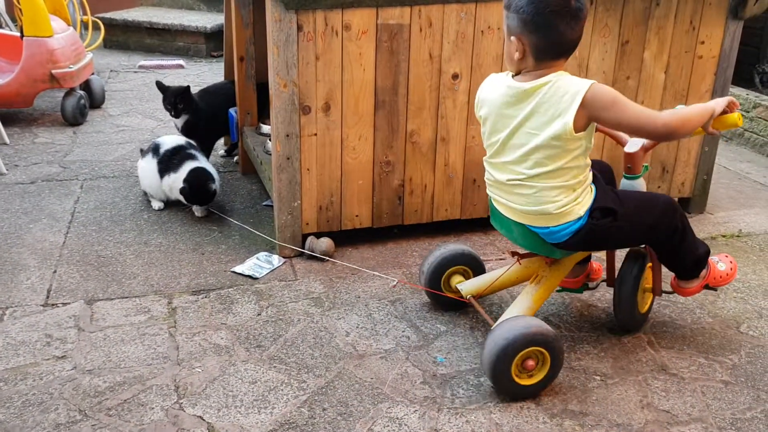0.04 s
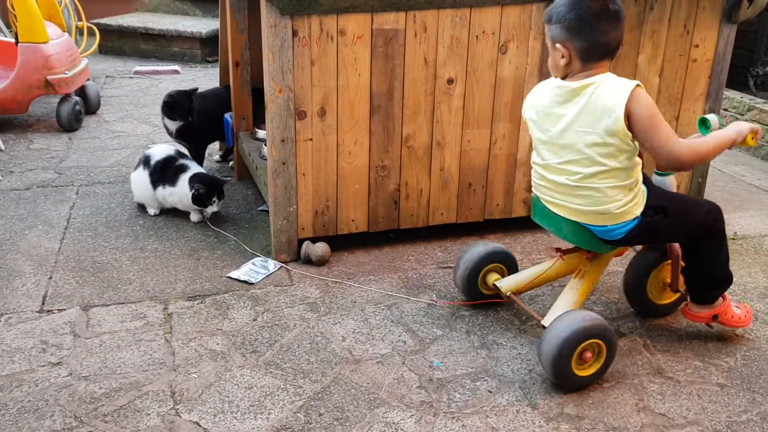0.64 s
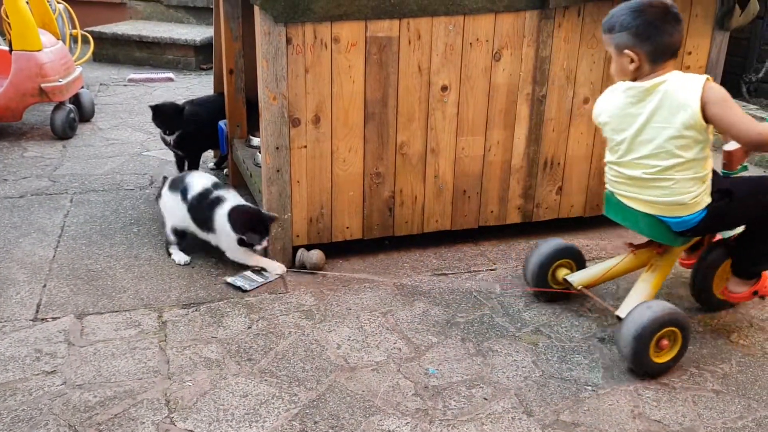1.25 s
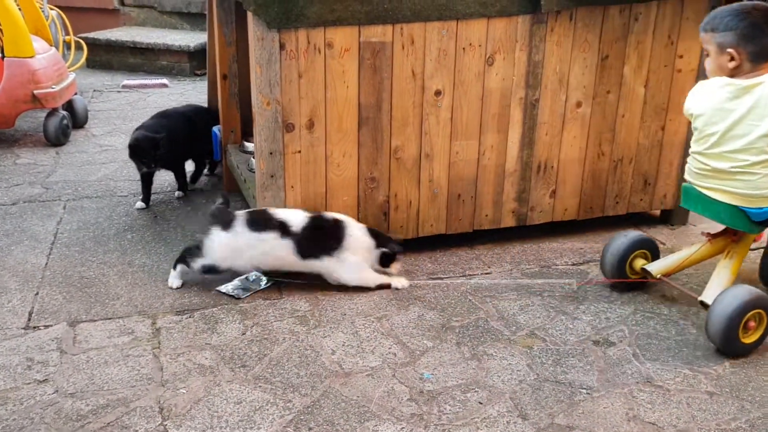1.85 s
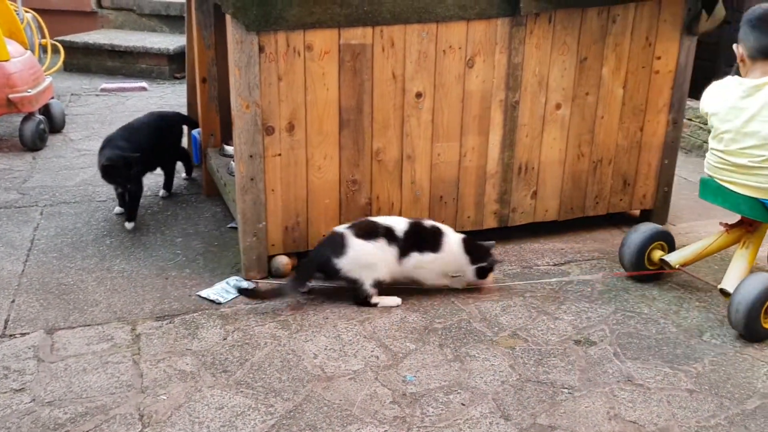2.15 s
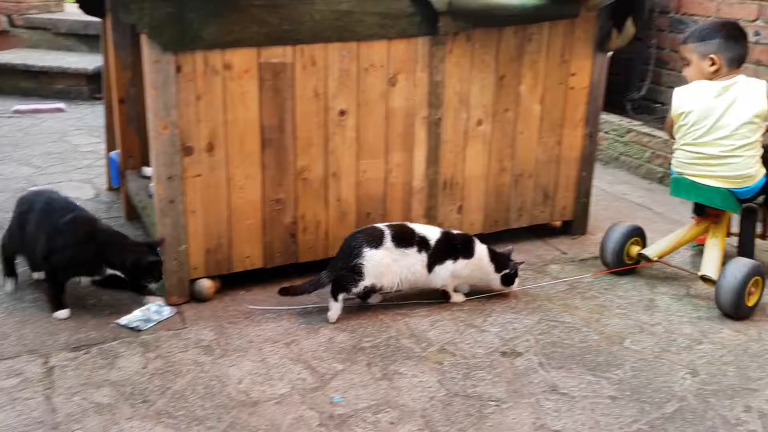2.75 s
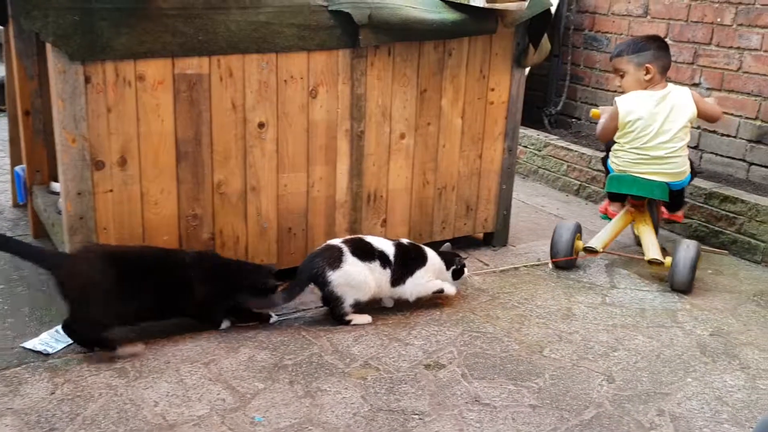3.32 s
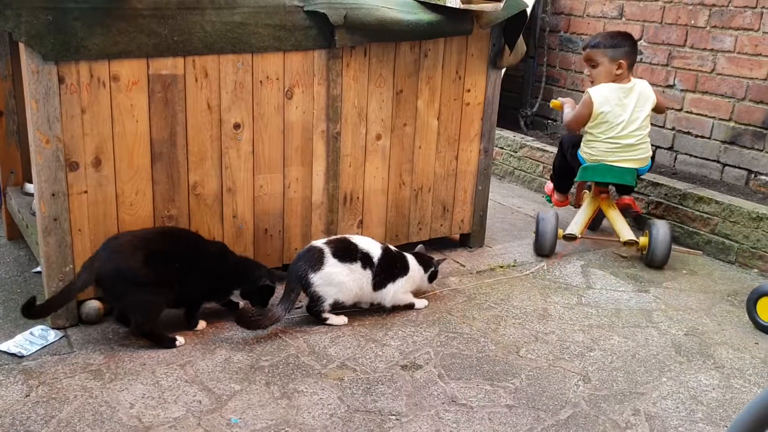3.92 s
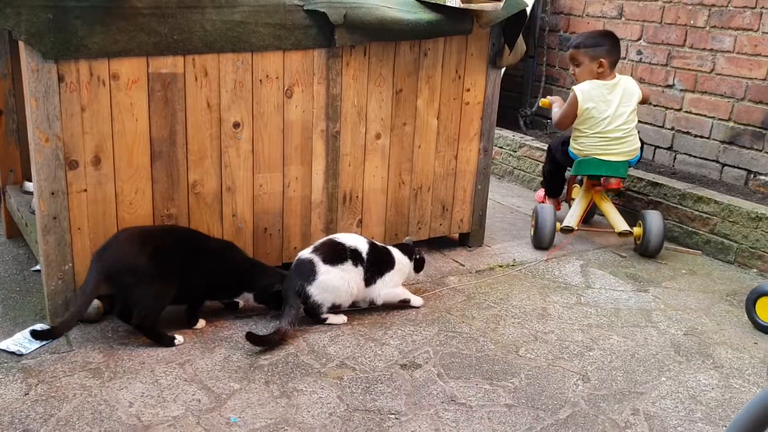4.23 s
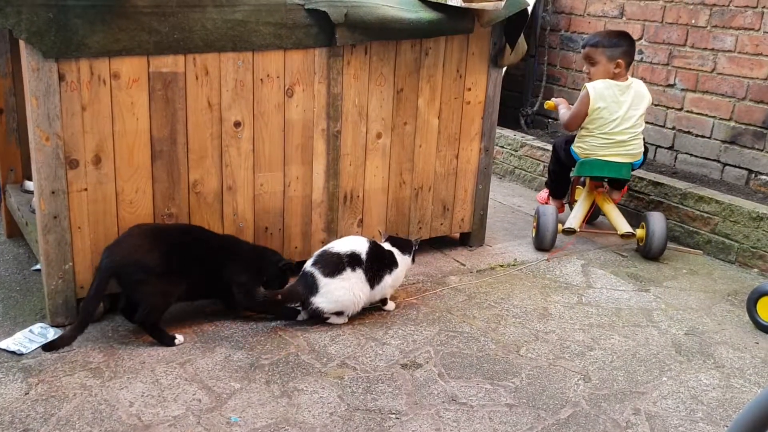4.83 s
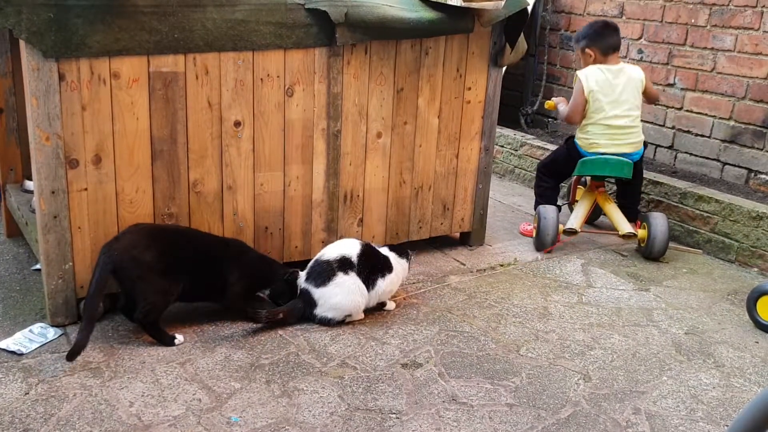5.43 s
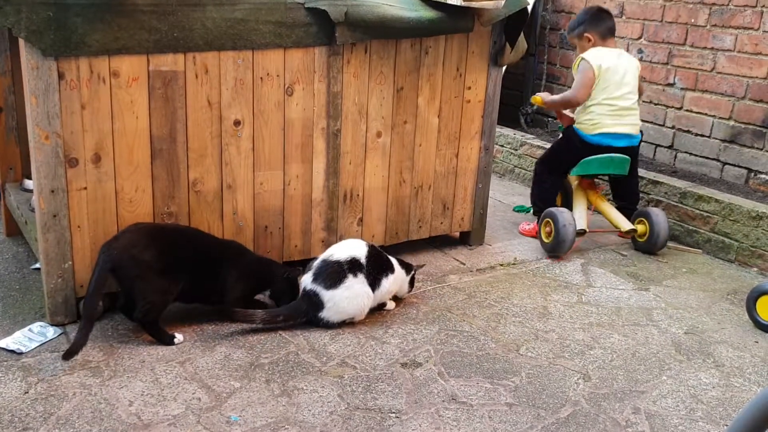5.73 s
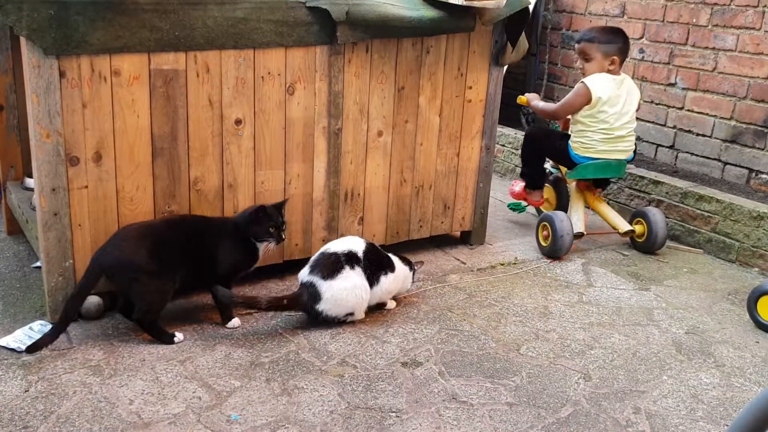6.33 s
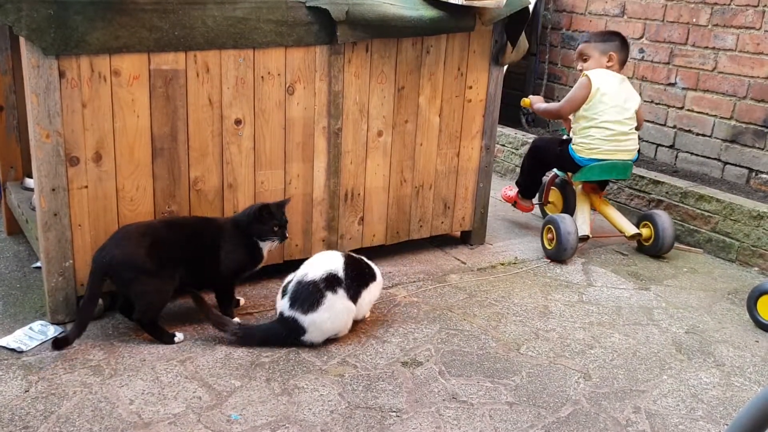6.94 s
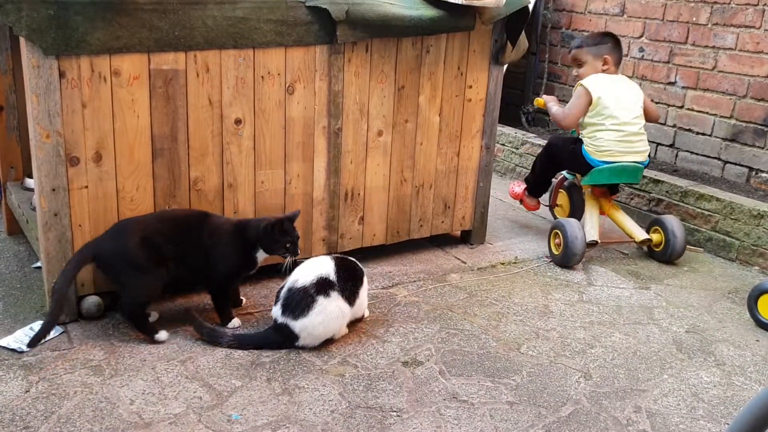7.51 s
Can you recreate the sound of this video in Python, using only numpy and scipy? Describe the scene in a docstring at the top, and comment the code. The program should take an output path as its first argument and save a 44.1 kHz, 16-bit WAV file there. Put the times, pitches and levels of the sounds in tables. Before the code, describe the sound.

In a small walled yard, hollow plastic tricycle wheels grind, rattle and clack across paving slabs nearby, stopping and starting. Grit crunches and snaps, and an axle groans briefly early on. The rolling thins into scuffs and scrapes, a distant bird whistles faintly, and the frame clatters in one rough jolt. A soft bump on the left and a sharp crack come at the end, over a quiet, steady town rumble.

```python
"""Hollow grinding, knocks and sharp cracks, stopping and starting: a plastic toy tricycle is pushed
over gritty paving in a walled yard. Its hollow wheels drum on the slabs, knock on their axles, groan
once and burst grains of grit. Shoes and tyres scuff, and once it is shoved round with a clatter.
Behind it are a low town rumble and a faint bird; a soft low bump comes near the end."""
import sys
import numpy as np
from scipy import signal
from scipy.fft import rfft, irfft, next_fast_len
from scipy.io import wavfile
from scipy.ndimage import map_coordinates

SR = 44100
rng = np.random.default_rng(int(sys.argv[2]) if len(sys.argv) > 2 else 0)


def unload_wav(signal):
    """Save mono or channel-first audio to the path in sys.argv[1] as 16-bit WAV at rate SR, clipped to [-1, 1]."""
    wavfile.write(
        sys.argv[1],
        SR,
        np.round(np.clip(np.atleast_2d(signal).T, -1, 1) * 32767).astype(np.int16),
    )


N = 338247

# The pitches a hollow wheel rings at. Each row: pitch in Hz, width in Hz, strength in dB.
WHEEL_RESONANCES = [(456, 59, 3.5), (910, 330, -4.5), (1817, 190, 3.5), (4210, 1300, -4)]
# Tone colours (how strong low and high sounds are). Each row: frequency in Hz, relative level in dB.
BOOM_COLOUR = [(120, -27.5), (250, -12.5), (340, -1.5), (500, -3), (700, -16.5), (1200, -16.5), (4000, -62)]  # a wheel's hollow inside
CLACK_COLOUR = [(300, -35.5), (650, 9.5), (1000, 14.5), (1700, 5.5), (2800, 6.5), (4200, 6.5),
                (15000, -80.5)]  # a wheel's hard shell
GRIT_COLOUR = [(500, 0.5), (2000, 5), (3800, 2), (7700, 2), (9000, -4.5), (12000, -3), (16000, -13.5)]  # a bursting grain
FRAME_COLOUR = [(250, 1.5), (800, 1), (1500, 1), (4200, -6.5), (8000, -10.5), (16000, -30)]  # the tricycle's frame


def amp(db):
    """Turns decibels into a number to multiply by."""
    return 10 ** (np.asarray(db) / 20)


def unit(x):
    """Scales a sound to an average (rms) level of 1."""
    return x / np.sqrt(np.mean(x ** 2) + 1e-20)


def along(points, hz):
    """Reads between (Hz, value) points, giving each octave about the same room."""
    frequencies, values = np.transpose(points)
    return np.interp(np.log(hz + 1), np.log(frequencies + 1), values)


def wobble(rate):
    """A smooth random curve through rate new values a second."""
    return map_coordinates(rng.standard_normal(int(N * rate / SR) + 4), [np.arange(N) * rate / SR])


def filtered(x, response):
    """Turns each frequency up or down by response(hz)."""
    n = x.shape[-1]
    padded = next_fast_len(n + SR // 20, True)
    return irfft(rfft(x, padded) * response(np.fft.rfftfreq(padded, 1 / SR)), padded)[..., :n]


def add(track, start_s, sound):
    """Mixes a sound into the track."""
    part = track[:, max(round(start_s * SR), 0):][:, :sound.shape[1]]
    part += sound[:, :part.shape[1]]


def centred(colour, centre_hz, fall_db):
    """Gives a tone colour a broad hump that falls by fall_db an octave on either side."""
    hz = np.geomspace(50, SR / 2, 60)
    return np.transpose([hz, along(colour, hz) - fall_db * np.abs(np.log2(hz / centre_hz))])


def detuned(resonances, spread):
    """Shifts each resonance's pitch a little, as when a wheel is hit at another spot."""
    return np.array(resonances) * np.exp(spread * rng.standard_normal((len(resonances), 1)) * [1, 0, 0])


def body(colour, resonances=(), ring_db=0, size=4096):
    """How an object answers one tap: a broad tone colour with ringing pitches standing out."""
    hz = np.fft.rfftfreq(size, 1 / SR)
    peaks = sum(amp(db + ring_db) * 1j * hz * width / (pitch * pitch - hz * hz + 1j * hz * width)
                for pitch, width, db in resonances)
    cepstrum = irfft(np.log(amp(along(colour, hz)) * np.abs(1 + peaks)))
    # Folding onto the first half makes the ringing follow the tap, never lead it.
    cepstrum[1:size // 2] *= 2
    cepstrum[size // 2 + 1:] = 0
    return irfft(np.exp(rfft(cepstrum)))[None]


def diffuse(n):
    """Stereo noise from all around: alike in the bass, unrelated in the treble."""
    # How alike the ears' sounds are. Each row: frequency in Hz, likeness (1 is the same, 0 unrelated).
    likeness = [(250, 0.89), (550, 0.55), (1000, -0.08)]
    angle = lambda hz: np.arccos(np.clip(along(likeness, hz), -1, 1)) / 2
    shares = lambda hz: np.array([np.cos(angle(hz)), np.sin(angle(hz))])
    mid, side = filtered(rng.standard_normal((2, n)), shares)
    return np.array([mid + side, mid - side])


def yard(direct_db=-15, near_fade_s=0.11, tail_db=-11, rise_s=0.0046):
    """One path to the listener: direct sound, quick echoes off slabs and fence, then the walls' echo."""
    # How long the walls echo. Each row: frequency in Hz, seconds to fade by 60 dB.
    fade_times = [(300, 0.29), (15000, 0.24)]
    n = SR // 4
    t = np.arange(n) / SR
    hz, times, bands = signal.stft(diffuse(n), SR, nperseg=256)
    fading = amp(-60 * times / along(fade_times, hz)[:, None])
    tail = signal.istft(bands * fading, SR, nperseg=256)[1][:, :n]
    near = diffuse(n) * amp(-60 * t / near_fade_s)
    echoes = (near + amp(tail_db) * tail) * (1 - np.exp(-t / rise_s))
    path = unit(echoes) / np.sqrt(n)
    path[:, 0] += amp(direct_db)
    return path


def blow(response, path):
    """One tap heard along a path, with an average level of 1 over its first 20 ms."""
    sound = signal.fftconvolve(path, response, axes=1)
    return sound / np.sqrt(np.mean(sound[:, :SR // 50] ** 2))


def tone(rows, waver, waver_rate, fade_s=0.0074):
    """A slightly unsteady tone that follows (seconds, Hz, dB) points and fades at both ends."""
    t = np.arange(N) / SR
    times, pitches, levels = np.transpose(rows)
    hz = np.interp(t, times, pitches) * (1 + waver * wobble(waver_rate))
    fade = np.clip(np.minimum(t - times[0], times[-1] - t) / fade_s + 1, 0, 1)
    gain = fade * amp(np.interp(t, times, levels))
    return gain * np.sqrt(2) * np.sin(2 * np.pi * np.cumsum(hz) / SR)


def slides(rows, response, slip_chance):
    """Each short slide is a swell of many tiny slips; slip_chance is per sample."""
    out = np.zeros((2, N))
    for start, length, db in rows:
        n = int(length * SR)
        slips = (rng.random(n) < slip_chance) * rng.standard_normal(n) * np.sqrt(np.hanning(n))
        one_slip = blow(response, yard(near_fade_s=0.026, tail_db=-18.5))
        slide = signal.fftconvolve(slips[None], one_slip, axes=1)
        add(out, start, amp(db) * slide / np.sqrt(np.mean(slide[:, :2 * n] ** 2) + 1e-20))
    return out


def town():
    """The far town rumbles steadily; a motor hums for a while."""
    # The rumble's tone colour. Each row: frequency in Hz, relative level in dB.
    colour = [(55, -2.5), (105, -6.5), (155, -1.5), (400, -16), (1000, -17), (1800, -29), (4300, -23),
              (15000, -38)]
    # The far motor. Each row: time in seconds, pitch in Hz, level in dB.
    hum = [(5.6, 55.35, -55.5), (6.8, 57.7, -53.5)]
    rumble = unit(filtered(diffuse(N), lambda hz: amp(along(colour, hz))))
    return amp(-53.5) * rumble + tone(hum, waver=0.018, waver_rate=6.9, fade_s=0.13)


def bird(from_hz=4200, to_hz=2770):
    """A distant bird's thin, trembling whistles fall in pitch and are smeared by the walls."""
    # Its notes. Each row: start in seconds, length in seconds, relative level in dB.
    notes = [(4.464, 0.081, -49), (4.613, 0.11, -53), (6.6, .125, -62), (6.828, 0.11, -57.5)]
    song = np.zeros((1, N))
    for start, length, db in notes:
        n = int(length * SR)
        hz = np.geomspace(from_hz, to_hz, n) * (1 + 0.035 * wobble(700)[:n])
        whistle = np.sqrt(np.hanning(n)) * np.sin(2 * np.pi * np.cumsum(hz) / SR)
        add(song, start, amp(db) * whistle[None])
    return amp(5) * signal.fftconvolve(song, yard(near_fade_s=0.3), axes=1)[:, :N]


def thud(peak_s=7.43, width_s=0.033):
    """A soft low bump, close by on the left."""
    colour = centred(FRAME_COLOUR, centre_hz=86, fall_db=9.5)
    swell = np.exp(-((np.arange(N) / SR - peak_s) / width_s) ** 2 / 2)
    low_noise = unit(filtered(diffuse(N), lambda hz: amp(along(colour, hz))))
    return swell * low_noise * amp([[-31.5], [-42.5]])  # left, right


def axles():
    """Plastic sticks and slips on steel: rough creaks, then a clean rising groan a little to the left."""
    # A dry hub creaking. Each row: start in seconds, length in seconds, level in dB.
    creaks = [(.24, 0.11, -52.5), (1.885, 0.078, -35.5)]
    # The pitches the hub rings at. Each row: pitch in Hz, width in Hz, strength in dB.
    hub_resonances = [(978, 75, 20), (2247, 48, 20.5)]
    # A wheel chattering on its axle. Each row: time in seconds, pitch in Hz, relative level in dB.
    chatter = [(2.155, 385, -37), (2.245, 448.5, -23), (2.28, 459, -35.5), (2.34, 466, -40)]
    groan = tone(chatter, waver=0.003, waver_rate=60) * amp([[2], [-3]])
    return slides(creaks, body(FRAME_COLOUR, hub_resonances), slip_chance=0.012) + groan


def scraping():
    """Grit dragged by shoes and tyres hisses drily; a wheel scrubbing sideways sounds hollow."""
    # The two kinds of slide. Each row: start in seconds, length in seconds, level in dB.
    scuffs = [(3.794, 0.027, -37), (4.66, 0.01, -45), (4.775, 0.016, -33.5), (4.824, 0.018, -48),
              (4.868, 0.019, -34), (5.38, .05, -43), (7.056, 0.0045, -34.5), (7.094, 0.01, -39),
              (7.146, 0.037, -39), (7.498, 0.02, -34.5)]
    scrubs = [(1.145, 0.067, -39.5), (3.312, 0.023, -40.5), (4.235, 0.04, -36.5), (4.872, 0.039, -42),
              (5.228, 0.024, -39.5), (5.39, 0.065, -38), (7.498, 0.038, -36.5)]
    # Their tone colours. Each row: frequency in Hz, relative level in dB.
    scuff_colour = [(600, -12.5), (2600, -15), (4500, 0.5), (5600, -2.5), (9000, -7), (11300, -3),
                    (16000, -15)]
    scrub_colour = [(150, -16.5), (350, 2.5), (1000, -1.5), (3000, -21.5)]
    # The hiss of crushed grit. Its one row: pitch in Hz, width in Hz, strength in dB.
    hiss_peak = [(7500, 570, 7)]
    hiss = slides(scuffs, body(scuff_colour, hiss_peak), slip_chance=0.024)
    return hiss + slides(scrubs, body(scrub_colour, WHEEL_RESONANCES), slip_chance=0.006)


def jolts():
    """Dropping off a slab edge or shoved round, the hollow body thumps and the frame clatters."""
    # Each row: start in seconds, relative thump and clatter levels in dB, clatter's centre in Hz.
    bumps = [(0.092, -19, -27.5, 2400), (1.853, -29, -23.5, 2500), (2.015, -40, -22, 1010),
             (3.171, -24.5, -25.5, 3000), (4.017, -41, -21, 2000), (5.698, -26.5, -13.5, 1500),
             (5.708, -27.5, -16.5, 1380), (5.759, -25.5, -27, 1700), (5.843, -30.5, -24.5, 1000),
             (5.871, -27.5, -21.5, 1700)]
    # The loose frame rattling on. Each row: start in seconds, length in seconds, level in dB.
    rattles = [(5.712, 0.083, -31), (5.842, 0.037, -32.5), (6.466, 0.026, -43)]
    # The plastic body's tone colour. Each row: frequency in Hz, relative level in dB.
    thump_colour = [(70, -33), (190, -4.5), (265, -2.5), (480, 0), (800, -5), (2500, -66)]
    # The pitches body and frame ring at. Each row: pitch in Hz, width in Hz, strength in dB.
    body_resonances = [(273, 47, 15.5), (485, 48, 9.5), (870, 150, 15.5)]
    frame_resonances = [(1160, 60, 1.5), (1220, 130, -7), (1506, 55, -7), (1690, 40, -9), (2485, 76, -6)]
    plastic = body(thump_colour, body_resonances)
    out = slides(rattles, body(FRAME_COLOUR, frame_resonances), slip_chance=0.022)
    for start, thump_db, clatter_db, centre_hz in bumps:
        frame = body(centred(FRAME_COLOUR, centre_hz, fall_db=4.5), frame_resonances)
        thump = amp(thump_db - 6.5) * blow(plastic, yard(direct_db=0))
        clatter = amp(clatter_db - 3.5) * blow(frame, yard(near_fade_s=0.065, rise_s=0.003))
        add(out, start, thump + clatter)
    return out


def cracks(burst_db=-9.5, clack_db=-24.5):
    """A grain of grit bursts, the smaller the higher; the wheel above answers with a small clack."""
    # The bursting grains. Each row: start in seconds, relative level in dB, centre frequency in Hz.
    grains = [(0.5016, -27, 4940), (1.091, -30.5, 3000), (1.261, -31, 6040), (1.3034, -18, 4560),
              (1.4523, -16, 4100), (1.5286, -12.5, 7850), (1.571, -17.5, 3560), (1.7225, -19, 3160),
              (1.772, -22, 3370), (2.032, -14.5, 5800), (2.146, -20, 4800), (2.3349, -22.5, 3500),
              (2.54, -29, 9500), (2.563, -26, 8200), (2.904, -23, 1970), (2.937, -7, 7000),
              (2.9427, -13, 7260), (3.053, -31.5, 5400), (3.619, -31.5, 4660), (3.7425, -21.5, 7000),
              (3.879, -29.5, 11300), (3.911, -30, 6100), (3.9777, -20.5, 7550), (4.184, -23.5, 3200),
              (4.591, -33.5, 8150), (4.749, -34, 7800), (5.513, -28.5, 6500), (6.4662, -24, 3800),
              (7.3464, -24.5, 6360), (7.54, -10.5, 4100)]
    shell, out = body(CLACK_COLOUR), np.zeros((2, N))
    for start, db, centre_hz in grains:
        grit = body(centred(GRIT_COLOUR, centre_hz, fall_db=7.0))
        path = yard(near_fade_s=0.056, tail_db=-13, rise_s=0.0015)
        crack = amp(burst_db) * blow(grit, path) + amp(clack_db) * blow(shell, path)
        add(out, start, amp(db) * crack)
    return out


def knocks(boom_db=-3.5, clack_db=-5.5, snap_db=-18):
    """Wheels knock on axles and slab joints, each time at another spot, so the ringing shifts a little."""
    # Each row: start in seconds, relative level in dB, hardness from 0 (hollow boom) to 1 (shell clack).
    hits = [(0.093, -25, 0.3), (0.677, -27, 0.65), (0.699, -31.5, 0.84), (0.735, -32.5, .25),
            (0.828, -37, 0.88), (.880, -25.5, 0.92), (0.909, -26.5, 0.99), (1.033, -25, 0.12),
            (1.337, -20, 0.71), (1.378, -32, 0.93), (1.571, -24, 0.22), (1.625, -22.5, 1),
            (1.853, -17.5, 0.38), (2.011, -19, 0.93), (2.078, -28, 0.37), (2.104, -24, 1),
            (2.146, -23.5, 1), (2.232, -26, 0.91), (2.670, -23, 0.74), (2.744, -33.5, 0.86),
            (2.788, -23.5, 0.6), (2.982, -24.5, 0.77), (3.036, -31.5, 1), (3.052, -27.5, 0.94),
            (3.109, -36, 1), (3.148, -29, 1), (3.433, -24, 0.93), (3.457, -29, 0.74), (4.017, -25.5, 0.18),
            (4.246, -35, 0.3), (4.315, -28.5, 0.84), (4.49, -30, 0.93), (5.322, -28.5, 0.94)]
    grit, out = body(GRIT_COLOUR), np.zeros((2, N))
    for start, db, hardness in hits:
        resonances = detuned(WHEEL_RESONANCES, spread=0.045)
        hollow = body(BOOM_COLOUR, resonances, ring_db=3)
        shell = body(CLACK_COLOUR, resonances, ring_db=9)
        path = yard(direct_db=-12, near_fade_s=0.13, tail_db=-11.5, rise_s=0.002)
        boom = np.sqrt(1 - hardness) * amp(boom_db) * blow(hollow, yard(direct_db=-2))
        clack = np.sqrt(hardness) * amp(clack_db) * blow(shell, path)
        snap = amp(snap_db) * blow(grit, path)
        add(out, start, amp(db) * (boom + clack + snap))
    return out


def pushing(speed_up_s=0.045, coast_db_per_s=97):
    """How loud the rumble and crunch are over time: each push builds up, holds and coasts away."""
    # Each row: start in seconds, length in seconds, relative level in dB, extra dB for the crunch.
    pushes = [(-.05, 1, -50, 3), (0.516, 0.4, -39.5, -7), (0.974, 0.67, -39, -0.5), (1.707, 0.37, -46, 2.5),
              (1.998, 0.36, -36.5, -2), (2.524, 0.51, -38.5, -3.5), (3.36, 0.8, -42.5, -6),
              (3.69, 0.12, -44, 5.5), (3.925, 0.51, -40, -7.5), (4.58, 0.093, -47, -5),
              (5.134, 0.45, -46, -1), (5.684, 0.43, -61, 4), (6.346, 0.27, -55, 1.5),
              (7.043, 0.15, -44, -9), (7.294, 0.32, -48, -12)]
    t, rumble, crunch = np.arange(N) / SR, np.zeros(N), np.zeros(N)
    for start, length, db, gritty_db in pushes:
        build_up = np.clip((t - start) / speed_up_s, 0, 1)
        speed = build_up * amp(-coast_db_per_s * np.maximum(t - start - length, 0))
        rumble = np.maximum(rumble, amp(db) * speed)
        crunch = np.maximum(crunch, amp(db + gritty_db) * speed)
    return rumble, crunch


def grinding(colour, per_second, spread_db, resonances=(), clump_db=2, clump_rate=30):
    """Tiny taps of random size, in clumps; the ringing and echoes change as the tricycle moves."""
    sizes = amp(spread_db * np.clip(rng.standard_normal(N), -2, 2) + clump_db * wobble(clump_rate))
    taps = (rng.random(N) < per_second / SR) * sizes * rng.choice([-1, 1], N)
    out, step = np.zeros((2, N)), SR // 3
    for i in range(0, N, step):
        response = body(colour, detuned(resonances, spread=0.06) if resonances else ())
        one_tap = blow(response, yard(near_fade_s=0.04, rise_s=0.0015))
        add(out, i / SR, signal.fftconvolve(taps[None, i:i + step], one_tap, axes=1))
    return unit(out)


def rolling():
    """Rough paving drums on the hollow wheels, their shells rattle, and coarse to fine grit crunches."""
    rumble_gain, crunch_gain = pushing()
    drum = grinding(BOOM_COLOUR, per_second=110, spread_db=4, resonances=WHEEL_RESONANCES)
    shell_colours = [centred(CLACK_COLOUR, hz, fall_db=5) for hz in (900, 2400)]
    rattle = unit(sum(grinding(colour, per_second=55, spread_db=4.5, resonances=WHEEL_RESONANCES)
                      for colour in shell_colours))
    grit_colours = [centred(GRIT_COLOUR, hz, fall_db=5) for hz in (2600, 5000, 10000)]
    crunch = unit(sum(grinding(colour, per_second=45, spread_db=5.2) for colour in grit_colours))
    return rumble_gain * (amp(-2) * drum + amp(-3) * rattle) + amp(1.5) * crunch_gain * crunch


def scene():
    """The tricycle and everything around it."""
    tricycle = rolling() + knocks() + cracks() + scraping() + jolts() + axles()
    return tricycle + bird() + thud() + town()


def record(dry, top_hz=16200):
    """Cuts off the very highest treble."""
    return filtered(dry, lambda hz: hz < top_hz)


dry = scene()
out = record(dry)
unload_wav(out)
```